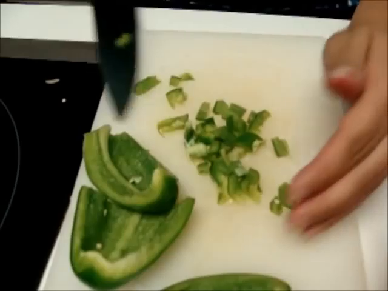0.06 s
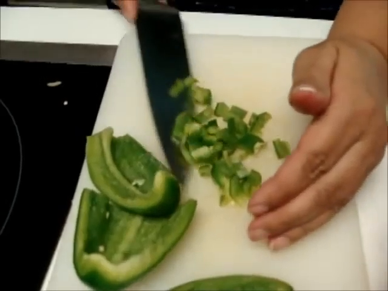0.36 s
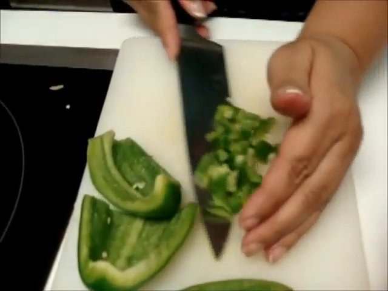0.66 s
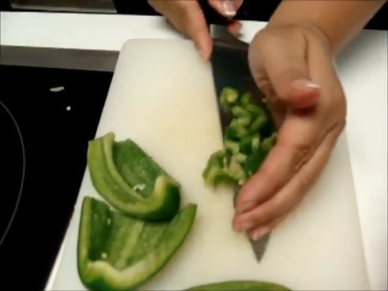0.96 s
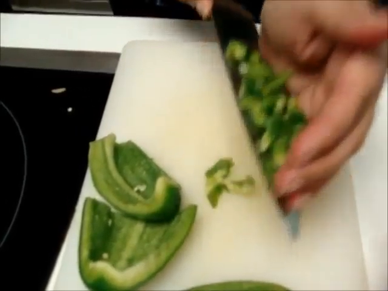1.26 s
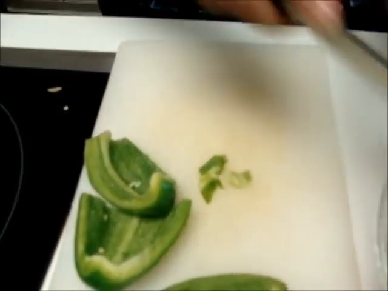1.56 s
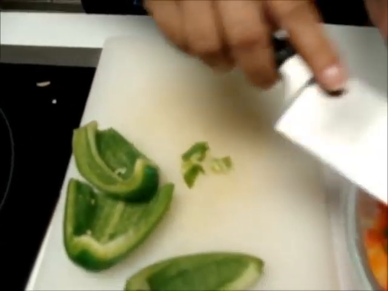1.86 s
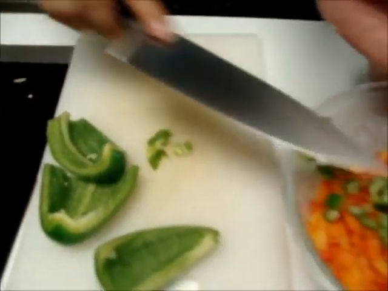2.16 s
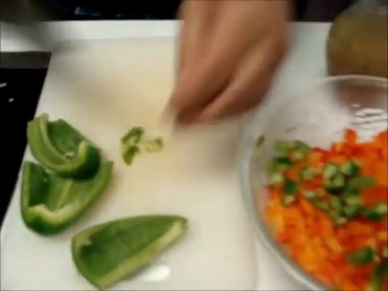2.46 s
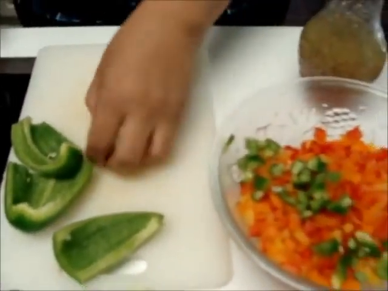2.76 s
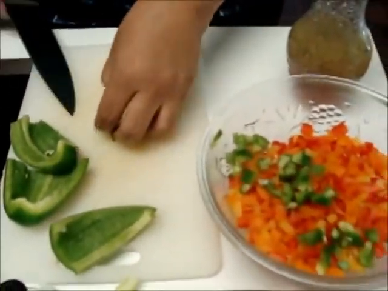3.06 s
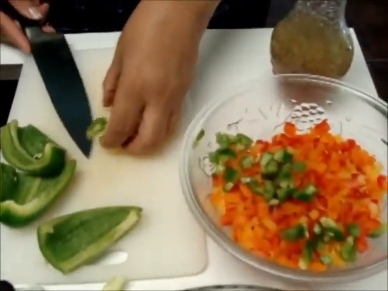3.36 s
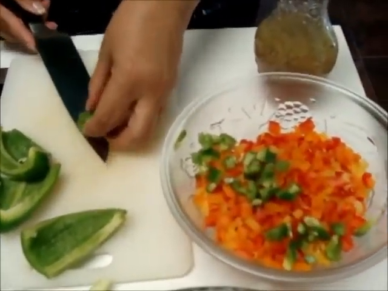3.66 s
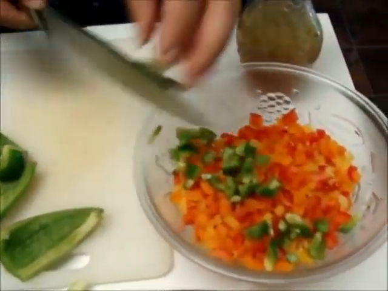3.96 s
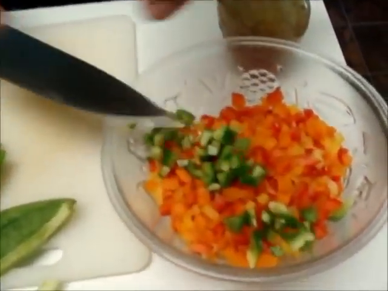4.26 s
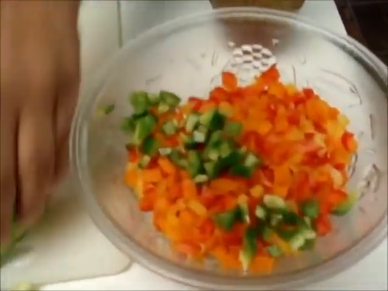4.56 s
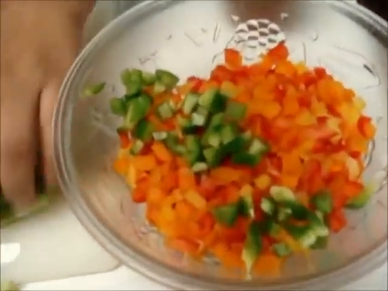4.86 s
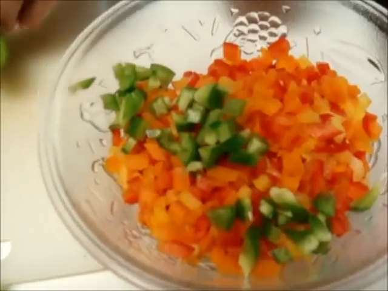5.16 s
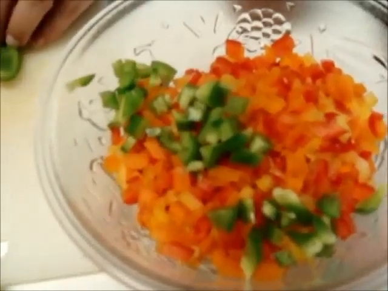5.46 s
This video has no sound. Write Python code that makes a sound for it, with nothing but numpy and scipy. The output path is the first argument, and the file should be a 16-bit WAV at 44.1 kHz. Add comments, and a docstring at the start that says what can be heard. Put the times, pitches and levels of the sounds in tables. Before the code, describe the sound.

A steel knife pushes chopped pepper over a plastic board in short, hissing strokes, heard close up in a small kitchen. Twice the blade knocks against a glass bowl and slides along its rim, making the glass ring, the first time with a longer, squealing scrape. Knocks and softer sweeps on the board come between and after these strikes, with quick reflections and a faint steady rumble and hiss behind.

```python
"""A small kitchen, one microphone close to a plastic cutting board, over steady room tone.
A chef's knife sweeps diced pepper across the board: the edge catches and hisses, knife and pieces knock.
Twice the knife knocks on the rim of a glass bowl and is wiped along it: the glass rings, the edge rasps
and friction sets the blade squealing. Worktop and cupboards send back quick reflections.
The recorder's limiter ducks under the loud strokes and recovers slowly."""
import sys
import numpy as np
from scipy import signal
from scipy.fft import rfft, irfft
from scipy.io import wavfile

SR = 44100
rng = np.random.default_rng(int(sys.argv[2]) if len(sys.argv) > 2 else 0)


def put_to_file(sound):
    """Save the sound as 16-bit audio at rate SR, in the file named by the first command-line argument."""
    columns = np.atleast_2d(sound).T  # one column per channel
    safe = np.clip(columns, -1, 1)
    whole_steps = np.round(safe * 32767)
    wavfile.write(sys.argv[1], SR, whole_steps.astype(np.int16))


N = 252075
TIME = np.arange(N) / SR

# Levels in the tables are relative, ahead of each layer's gain.
# Spectrum of the room tone: frequency_hz, level_db
ROOM_SPECTRUM = [(15, -44), (25, -8), (32, -20), (60, -2.5), (90, -14), (128, -2.5), (398, -4), (625, -4),
                 (1260, -11.5), (2090, -8.5), (3050, -15.5), (3370, -15.5), (4120, -16.5), (8550, -19.5),
                 (10200, -26.5), (13300, -63.5), (22000, -120)]
# Blade and hand pushing pepper over the board: fastest_s, swell_s, rumble_db, hiss_db
SWEEPS = [(0.104, 0.023, -25.5, -34), (.2, 0.043, -55.5, -57.5), (0.344, 0.031, -38.5, -45.5),
          (.645, 0.099, -39.5, -41.5), (.91, 0.037, -48, -51.5), (1.14, 0.095, -56, -56.5),
          (1.5, 0.11, -50, -51.5), (1.85, 0.033, -62, -58.5), (2.63, 0.052, -45, -51),
          (2.83, 0.028, -65, -66), (3.0, 0.0078, -45.5, -58), (3.2, 0.046, -44, -64),
          (3.341, 0.095, -48.5, -47), (3.7, 0.058, -70.5, -64.5), (3.99, 0.063, -63, -60),
          (4.892, 0.038, -52, -51), (5.45, 0.018, -60, -57), (5.62, 0.063, -77, -59)]
# Spectra of the rubbed board and of the sliding edge: frequency_hz, level_db
RUMBLE_SPECTRUM = [(88, -72), (150, -24.5), (326, -3), (430, -8), (603, -6), (1090, -8.5), (1220, 1.5),
                   (1660, -4.5), (3000, -12.5), (3900, -66), (6600, -120)]
HISS_SPECTRUM = [(1290, -35.5), (2200, -0.5), (2520, 0), (2790, -1), (3360, -1.5), (4600, -2.5),
                 (5000, -5.5), (5540, 0), (6720, -3), (7400, 1.5), (8520, -2), (9630, 0.5), (10200, -20.5),
                 (13300, -32), (22000, -120)]
# Modes of the board with the knife on it: pitch_hz, level_db, t60_s
BOARD_MODES = [(288, -22, 0.073), (537, -5, 0.04), (634, -4, 0.077), (878, -6.5, 0.062), (1139, -3, 0.043),
               (1247, 1, 0.04), (1377, -1, 0.043), (2054, -4, 0.0096), (2810, -3.5, 0.026),
               (3710, 2, 0.012), (4610, -6, 0.029)]
# Knocks and cracks on the board, and low thuds under the two loud bowl strikes:
# start_s, thud_db, crack_db, crack_low_cut_hz
KNOCKS = [(0.521, -56, -27.5, 2470), (0.662, -41, -20.5, 5000), (1.083, -24, -44, 200),
          (1.932, -7, -16.5, 200), (2.574, -46, -26.5, 1000), (2.595, -25, -28.5, 400),
          (2.756, -41, -36, 300), (3.075, 0.5, -17, 201), (3.102, -10, -36, 200), (4.234, -20.5, -23, 99),
          (4.661, -24, -27, 300), (4.689, -18, -32.5, 200), (4.787, -27, -26.5, 1485),
          (4.905, -34, -36.5, 200), (5.264, -32, -36.5, 400), (5.390, -22.5, -7.5, 9100),
          (5.394, -50, -33, 9000)]
# Spectrum of a hard contact: frequency_hz, level_db
CRACK_SPECTRUM = [(100, -24), (400, 0.5), (1200, 5.5), (3000, 6), (6000, -1), (10000, -3)]
# Short blade tones, a low ring at the first clink, then squeals gliding as the free length changes:
# start_s, length_s, start_hz, end_hz, level_db
BLADE_TONES = [(1.711, 0.064, 730, 740, -44.5), (1.71, 0.026, 4900, 4880, -38),
               (1.931, .072, 1021, 1152, -19), (1.928, .072, 2235, 2434, -26),
               (2.058, 0.059, 3602, 3740, -18.5), (2.074, 0.057, 1925, 2587, -23),
               (2.104, 0.118, 3690, 3803, -10.5), (2.112, 0.11, 1510, 1595, -30.5),
               (2.115, 0.11, 4930, 4935, -4), (2.1, 0.17, 6970, 6890, -12),
               (2.135, 0.181, 8700, 8620, -7.5), (2.177, 0.025, 2970, 2810, -14.5),
               (4.282, 0.042, 1364, 1590, -27.5)]
# Blade striking the bowl's rim: start_s, glass_db, rattle_db, brightness_hz
CLINKS = [(1.716, -31.5, -62, 1800), (1.933, -24, -15.5, 4400), (1.948, -34, -18, 12000),
          (2.024, -50, -26.5, 13700), (2.105, -36, -33.5, 14000), (4.233, -20.5, -21, 5830),
          (4.249, -12.5, -25, 11900), (4.329, -30, -29, 14000)]
# Modes of the glass bowl and of the hand-held steel blade: pitch_hz, level_db, t60_s
BOWL_MODES = [(1755, -32.5, 1), (1751, -9, 0.55), (3113, -8, 0.33), (3165, -8, 0.5), (4830, -17, 0.44),
              (4950, -8, 0.79), (4925, -17, 0.31), (4760, -22.5, 0.14), (7060, -8, 0.34), (7040, -1, 0.41),
              (7100, -6, 0.39), (8080, -9, 0.32), (8550, -1, 0.24), (8590, -11.5, .3), (9340, -1.5, 0.063),
              (9440, 1, 0.18)]
BLADE_MODES = [(318, 1.5, 0.045), (502, -3, 0.13), (618, -6.5, 0.064), (741, -6.5, 0.18), (1250, -7, 0.047),
               (1550, -11.5, 0.5), (1970, -41, .08), (3200, 3, 0.18), (3420, -10, 0.052),
               (4670, -20, 0.062), (7100, -0.5, 0.098), (7450, 3, 0.043), (8150, 6, 0.091),
               (8560, -0.5, 0.066), (9190, -11, .08), (9290, -5, 0.11)]
# Blade wiped along the rim: start_s, swell_s, length_s, landing_db, full_db, cut_from_hz, cut_to_hz
WIPES = [(1.932, 0.028, 0.053, -35, -36, 300, 310), (2.022, 0.11, .252, -32, -8.5, 400, 6200),
         (4.234, 0.014, .112, -11.5, -10, 6650, 5900)]
# Spectrum of steel rasping on glass: frequency_hz, level_db
RASP_SPECTRUM = [(150, -24), (300, 6), (1200, -7.5), (2500, -7), (3500, -6), (4200, -6), (4950, 3),
                 (6000, -9.5), (6900, -0.5), (7900, -5.5), (8700, -0.5), (9900, -6.5), (11000, -1.5)]


def from_db(db):
    """Decibels to gain."""
    return np.exp(np.log(10) / 20 * np.asarray(db))


def rms_one(x):
    """Scale to an rms of 1."""
    return x / np.sqrt(np.mean(x ** 2) + 1e-20)


def dull(x, hz):
    """One-pole low-pass."""
    pole = np.exp(-2 * np.pi * hz / SR)
    return signal.lfilter([1 - pole], [1, -pole], x + 1e-18)


def drift(hz, step=32):
    """Slow random wander with a spread of 1, drawn once every few samples."""
    noise = rng.standard_normal(2 * N // step)
    coarse = dull(dull(noise, hz * step), hz * step)[N // step - 2:]
    return np.interp(np.arange(N) / step, np.arange(len(coarse)), rms_one(coarse))


def colour(x, spectrum, size=2048):
    """Minimum-phase filter with the given spectrum and unit energy."""
    hz, db = np.transpose(spectrum)
    bins_hz = np.fft.rfftfreq(size, 1 / SR)
    log_gain = np.log(from_db(np.interp(np.log(bins_hz + 1), np.log(hz), db)))
    causal_cepstrum = irfft(log_gain) * np.r_[1, np.full(size // 2 - 1, 2), np.zeros(size // 2)]
    response = irfft(np.exp(rfft(causal_cepstrum)))
    return signal.oaconvolve(x, response / np.linalg.norm(response))[:N]


def ring(force, modes):
    """A force sets each mode ringing at its own level; signs alternate."""
    out = np.zeros(N)
    for k, (hz, db, t60_s) in enumerate(modes):
        radius, angle = from_db(-60 / (t60_s * SR)), 2 * np.pi * hz / SR
        feedback = [1, -2 * radius * np.cos(angle), radius ** 2]
        out += (-1) ** k * from_db(db) * signal.lfilter([0, np.sin(angle)], feedback, force + 1e-18)
    return out


def slips(per_s, spread_db):
    """Stick-slip friction: random clicks of uneven size, rms 1."""
    sizes = from_db(spread_db * np.minimum(rng.exponential(1, N), 3)) * rng.choice([-1, 1], N)
    return rms_one(sizes * (rng.random(N) < per_s / SR))


def clicks(times_s, db):
    """One click of the given level at each time."""
    out = np.zeros(N)
    out[np.round(np.asarray(times_s) * SR).astype(int)] = from_db(db)
    return out


def fading(blows, decay_s):
    """Each blow dies away exponentially."""
    return signal.lfilter([1], [1, -np.exp(-1 / (decay_s * SR))], blows + 1e-18)


def room_tone(level_db=-53):
    """A steady low rumble and soft hiss behind the work."""
    return from_db(level_db) * rms_one(colour(rng.standard_normal(N), ROOM_SPECTRUM, size=8192))


def board_sweeps(flicker_db=0.77, flicker_hz=18.4):
    """The edge catches on scored plastic: the board rumbles, steel and wet pepper hiss with speed."""
    rumble = rms_one(colour(slips(per_s=3500, spread_db=3.5), RUMBLE_SPECTRUM))
    ringing = rms_one(ring(slips(per_s=2500, spread_db=5.5), BOARD_MODES))
    body = from_db(-8.5) * rumble + from_db(-6.5) * ringing
    hiss = from_db(1.8) * rms_one(colour(slips(per_s=3000, spread_db=3.5), HISS_SPECTRUM))
    flicker = from_db(flicker_db * drift(flicker_hz))   # a slight random flicker in the sweeps' level
    out = np.zeros(N)
    for fastest_s, swell_s, rumble_db, hiss_db in SWEEPS:
        hand_speed = 1 / np.cosh(np.clip((TIME - fastest_s) / swell_s, -20, 20))
        out += hand_speed * (from_db(rumble_db) * body + from_db(hiss_db) * hiss)
    return flicker * out


def knocks(crack_decay_s=0.003):
    """Damped thuds topped by short cracks, on the board and under the two loud bowl strikes."""
    times_s, thud_db = np.transpose(KNOCKS)[:2]
    thuds = from_db(-18) * ring(dull(clicks(times_s, thud_db), hz=6000), BOARD_MODES)
    grit, cracks = rng.standard_normal(N), np.zeros(N)
    for start_s, _, crack_db, low_cut_hz in KNOCKS:
        burst = fading(clicks([start_s], [crack_db]), crack_decay_s) * grit
        cracks += burst - dull(burst, low_cut_hz)   # small crisp pieces crack higher
    return thuds + colour(cracks, CRACK_SPECTRUM)


def blade_tones(rise_s=0.0072, flutter_hz=70, rough_above_hz=2900):
    """The blade's bending modes: a low ring at the first clink, then gliding friction squeals."""
    out = np.zeros(N)
    flutter = (drift(flutter_hz) + 1j * drift(flutter_hz)) / np.sqrt(2)
    for start_s, length_s, start_hz, end_hz, db in BLADE_TONES:
        t = np.arange(int(length_s * SR)) / SR
        phase = 2 * np.pi * np.cumsum(np.linspace(start_hz, end_hz, len(t))) / SR
        swell = (1 - np.exp(-t / rise_s)) * np.cos(np.pi / 2 * t / length_s)
        roughness = start_hz ** 2 / np.hypot(start_hz ** 2, rough_above_hz ** 2)   # highs flutter more
        pick, at = rng.integers(N // 2), int(start_s * SR)
        unsteady = np.sqrt(1 - roughness ** 2) + roughness * flutter[pick:pick + len(t)]
        out[at:at + len(t)] += from_db(db) * swell * np.real(unsteady * np.exp(1j * phase))
    return out


def glass_bowl(force, waver_db=8.0, waver_hz=22):
    """Each rim mode rings, its level wavering as blade and hand move over the bowl."""
    return sum(ring(force, [mode]) * from_db(waver_db * np.tanh(drift(waver_hz))) for mode in BOWL_MODES)


def bowl_clinks(bounce_decay_s=0.0037):
    """Steel on glass: a hard tick, the blade rattles briefly, and the rim modes ring on."""
    force, bounce = np.zeros(N), np.zeros(N)
    for start_s, glass_db, rattle_db, brightness_hz in CLINKS:
        force += dull(dull(clicks([start_s], [glass_db]), brightness_hz), brightness_hz)
        tiny_contacts = fading(clicks([start_s], [rattle_db]), bounce_decay_s) * rng.standard_normal(N)
        bounce += dull(tiny_contacts, brightness_hz)
    tick = from_db(-3.5) * colour(bounce, CRACK_SPECTRUM)
    rattle = from_db(-25.5) * ring(bounce, BLADE_MODES)
    return glass_bowl(force) + rattle + tick


def wipe_pressure(start_s, swell_s, length_s, landing_db, full_db, ease_db_per_s=33.5, lift_db_per_s=482):
    """The edge lands, presses harder, eases off and lifts."""
    t = TIME - start_s
    bite = np.clip(t / swell_s, 0, 1) ** 2.36   # slides lightly at first, then bites
    pressed_db = landing_db + (full_db - landing_db) * bite
    eased_db = ease_db_per_s * np.maximum(t - swell_s, 0)
    lifted_db = lift_db_per_s * np.clip(t - length_s, 0, .5)
    return (t > 0) * from_db(pressed_db - eased_db - lifted_db)


def rim_squeaks(spans, per_s=700, length_s=.028, glide=.04):
    """Moments of regular stick-slip: brief tones at random pitches, most rising; rms 1 while they last."""
    out, t = np.zeros(N), np.arange(int(length_s * SR)) / SR
    window = np.sin(np.pi * t / length_s)
    for start_s, end_s in spans:
        span_s = end_s - start_s + length_s
        for when, pitch, bend, size in rng.random((int(per_s * span_s), 4)):
            hz = (1200 + 9000 * pitch) * (1 + glide * (2 * bend - .5) * t / length_s)
            at = int((start_s - length_s + when * span_s) * SR)
            out[at:at + len(t)] += from_db(10 * size) * window * np.sin(2 * np.pi * np.cumsum(hz) / SR)
    return out / np.std(out[out != 0])


def rim_wipes(fine_above_hz=4200):
    """The edge chatters and squeaks along the rim, thins toward the tip and keeps the glass singing."""
    spans = [(start_s, start_s + length_s) for start_s, _, length_s, *_ in WIPES]
    chatter = slips(per_s=2500, spread_db=2.5) * from_db(2.2 * drift(hz=110))
    pressure = sum(wipe_pressure(*wipe[:5]) for wipe in WIPES)
    rasp = colour((chatter + rim_squeaks(spans)) * pressure, RASP_SPECTRUM)
    # the shorter the free blade, the less of the low range it radiates
    hz, frame_s, frames = signal.stft(rasp, SR, nperseg=256)
    log_cuts = np.log([wipe[5:] for wipe in WIPES]).ravel()
    low_cut_hz = np.exp(np.interp(frame_s, np.ravel(spans), log_cuts))
    thinning = hz[:, None] ** 2 / np.hypot(hz[:, None] ** 2, low_cut_hz ** 2)
    thinned_rasp = signal.istft(frames * thinning, SR)[1][:N]
    # such fine contacts reach only the high modes of the glass
    high_pass = signal.butter(2, fine_above_hz, "high", fs=SR, output="sos")
    fine_contacts = signal.sosfilt(high_pass, pressure * chatter + 1e-18)
    return thinned_rasp + from_db(-42) * glass_bowl(fine_contacts)


def kitchen(direct, early_db=-7, early_t60_s=0.067, late_db=-13, late_t60_s=0.53, wall_hz=8000):
    """Direct sound reaches the microphone first, then worktop and cupboard reflections and a soft tail."""
    t = np.arange(SR * 3 // 4) / SR
    out = direct
    for db, t60_s in ((early_db, early_t60_s), (late_db, late_t60_s)):
        decay = from_db(-60 * t / t60_s) * (t > .002)
        echoes = dull(rng.standard_normal(len(t)), wall_hz) * decay
        out = out + from_db(db) * signal.oaconvolve(direct, echoes / np.linalg.norm(echoes))[:N]
    return out


def scene():
    """Board, blade and bowl close to the microphone, in mono, over the room tone."""
    background = room_tone()
    knife_work = board_sweeps() + knocks() + bowl_clinks() + rim_wipes() + blade_tones()
    return (kitchen(knife_work) + background)[None]


def limiter_gain(x, ceiling_db=-15.5, release_db_per_s=22, sense_hz=250, attack_hz=130):
    """The gain drops quickly when the short-time level passes the ceiling, and creeps back."""
    level_db = 10 * np.log10(dull(x ** 2, sense_hz) + 1e-12)
    over_db = np.maximum(level_db - ceiling_db, 0)
    release_db = release_db_per_s * TIME
    held_db = np.maximum.accumulate(over_db + release_db) - release_db
    return from_db(-dull(held_db, attack_hz))


def record(dry, cutoff_hz=10200, offset=0.11, coupling_hz=14, clip_at=.48):
    """The recorder cuts the top, limits and clips; the limiter moves the input's offset, which thumps."""
    top_cut = signal.ellip(10, .3, 70, cutoff_hz, fs=SR, output="sos")
    microphone = signal.sosfilt(top_cut, dry[0])
    gain = limiter_gain(microphone)
    limited = gain * microphone + offset * (gain - 1)
    coupled = limited - dull(limited, coupling_hz)
    return signal.sosfilt(top_cut, np.clip(coupled, -clip_at, clip_at))[None]


dry = scene()
out = record(dry)
put_to_file(out)
```